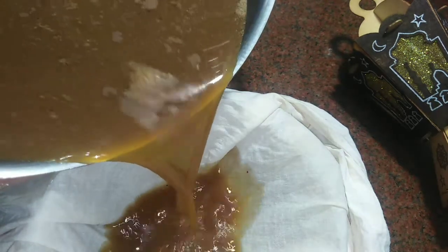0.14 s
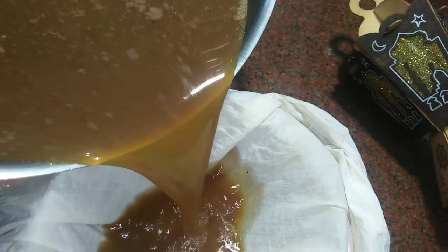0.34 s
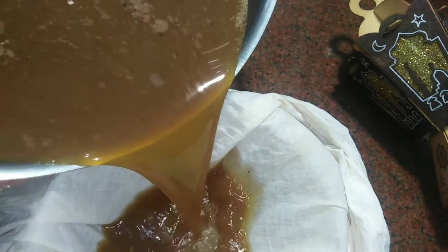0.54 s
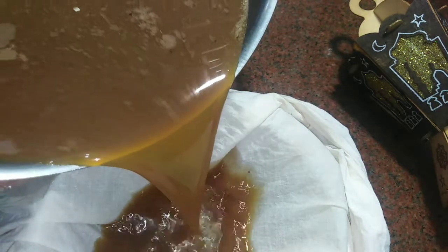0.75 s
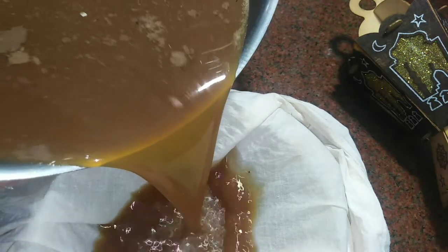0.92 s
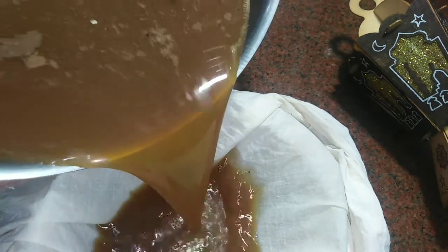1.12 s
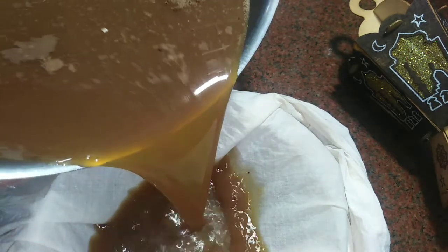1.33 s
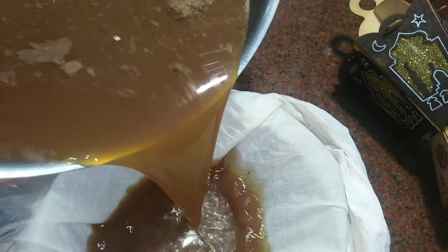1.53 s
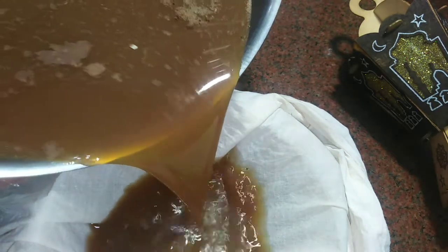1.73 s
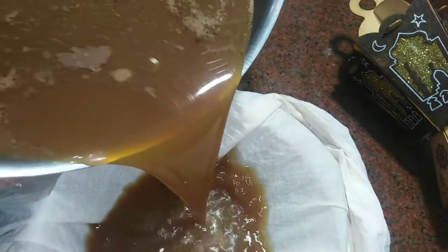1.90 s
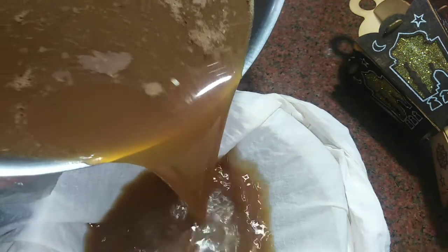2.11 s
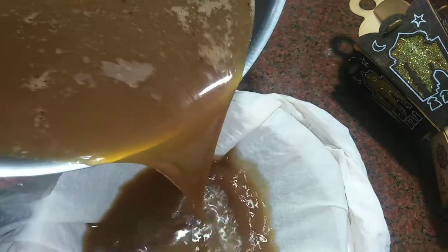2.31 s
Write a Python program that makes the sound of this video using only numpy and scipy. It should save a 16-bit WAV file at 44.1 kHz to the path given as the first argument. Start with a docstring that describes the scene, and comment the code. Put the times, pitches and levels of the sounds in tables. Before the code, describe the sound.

Close wet splatter and popping bubbles of poured syrupy liquid, soon fading beneath a low fan rumble

```python
"""In a kitchen, thick liquid is poured onto a cloth strainer close to a pair of microphone ports.
Bubbles burst and droplets tick, thickly at first, then one by one: short rough sines, each trailed by
background noise let through round its pitch. Ringing drops, fizz and treble specks fill in the splashing.
Below them a fan motor rumbles (banded noise) and hums (sines at multiples of the rotor speed).
A thin whistle sounds on the left, faint rings come and fade, and a soft patchy hiss lies under all."""
import sys
import numpy as np
from scipy import signal
from scipy.io import wavfile

SR = 44100
rng = np.random.default_rng(int(sys.argv[2]) if len(sys.argv) > 2 else 0)


def boost(x):
    """Linear amplitude factor 10**(x/20) for a level x in decibels (scalar or array-like)."""
    u = np.asarray(x, float) / 20
    return 10 ** u


def to_wav(s):
    """Save 16-bit WAV."""
    ch = np.atleast_2d(s).T  # columns
    pcm = np.round(np.clip(ch, -1, 1) * 32767)  # PCM
    wavfile.write(sys.argv[1], SR, pcm.astype(np.int16))


N = 108530  # length in samples

# In all tables a positive left_minus_right_db means louder on the left.
# Bursting bubbles and droplets: start_s, level_db, pitch_hz, left_minus_right_db,
# ringing_cycles (the least number; small or soft pops may ring longer)
POPS = [(0.001, -20.5, 7700, -11, 5.2), (0.0109, -16, 9000, -14.5, 29), (0.031, -30, 3460, -12, 10.6),
        (0.071, -38, 3960, -5, 21), (0.0385, -24.5, 12100, -13, 6.0), (0.0483, -34, 7560, -4, 6.4),
        (0.0662, -17, 9440, -6, 8.5), (0.066, -32, 6440, 1, 8), (0.0876, -51, 6440, 2, 7.3),
        (0.113, -43, 6000, -13.5, 5.7), (0.1145, -17, 10600, -17, 2.9), (0.1396, -51, 2110, -19, 5.2),
        (0.1404, -15.5, 8950, -3, 2.6), (0.211, -28.5, 7650, -7, 8.4), (0.1444, -13.5, 10900, -36, 33.5),
        (0.184, -30, 6660, 2, 7), (0.163, -31, 11800, -33, 6), (0.1838, -24, 12100, -24, 2.3),
        (0.1832, -28, 5000, -2, 7), (0.2128, -17, 11500, -40, 22), (0.231, -28, 11700, -29, 6.8),
        (0.231, -26.5, 4800, 2, 11.4), (0.2357, -20.5, 8300, -4, 4.3), (0.2493, -12.5, 12200, -36, 5.8),
        (0.2492, -14, 6650, 6, 4.7), (0.253, -38, 1766, -8, 6.3), (0.251, -28, 3430, -10, 6.1),
        (0.259, -34, 11670, -30, 4.4), (0.3023, -20.5, 4320, 1, 7.7), (0.306, -20.5, 6110, -3, 8.3),
        (0.2855, -25, 11800, -31, 7.5), (0.2991, -12, 13200, -22, 6.3), (0.3048, -15, 11070, -35.5, 1.4),
        (0.316, -23.5, 11800, -37, 25), (0.351, -33, 3300, 0, 5.2), (0.348, -27, 4850, -20, 4.6),
        (0.3488, -19, 11800, -25.5, 6.0), (0.3601, -30, 1400, -14, 5.9), (0.361, -37.5, 956, -11, 3),
        (0.379, -41, 11800, -27, 8.8), (0.3842, -26, 6960, 2, 3.3), (0.411, -49, 4140, 5, 10),
        (0.432, -43, 11720.0, -41, 5.38), (0.2582, -28.5, 3160, -4, 8), (0.4757, -29, 12100, -48, 2.5),
        (0.477, -26, 5800, -19, 7), (0.4769, -34, 1540, -4, 9), (0.485, -31.5, 4700, -5, 33),
        (0.495, -19, 9100, -11, 5.9), (0.499, -26.5, 6200, 25, 9.1), (0.4982, -33.5, 1580, -6.5, 16),
        (0.502, -25.5, 12000, -41, 16), (0.5133, -14, 12820, -29, 9), (0.499, -29, 3280, 0.5, 5.9),
        (0.51, -26, 4800, -2, 4.5), (0.5377, -33, 6800, 4, 3.8), (0.552, -31.5, 6180, -12, 13),
        (0.571, -47, 5950, -11, 8.4), (0.662, -45, 7700, -16, 8), (0.6601, -18.5, 12470, -24, 12.4),
        (0.89, -34, 8460, -23, 16), (0.7188, -49.5, 4140.0, -27, 8.4), (0.739, -48, 9400, -23, 26),
        (0.7422, -33, 13800, -38, 9.1), (0.766, -25.5, 10850, -22, 6.3), (0.76, -23, 12300, -39, 7.6),
        (0.8452, -31.5, 11800, -46, 6.0), (0.8494, -31, 13000, -40, 9.7), (0.855, -49, 4520, 11, 17.6),
        (0.879, -52, 4060, -11, 8.7), (0.89, -43, 3730, -1, 19), (0.8805, -15.5, 8650, -9.5, 11.6),
        (0.891, -23.5, 11700, -14, 25), (0.9027, -23, 12300, -26, 11), (0.909, -38.5, 4680, -16, 16),
        (0.91, -45.5, 5600, -2, 16), (0.9092, -37, 7700, 8, 6.1), (0.911, -32, 12100, -28, 7.5),
        (0.9298, -51, 2820, -8, 40), (0.968, -50, 5640, -7, 10), (0.968, -24.5, 10000, -26, 7.1),
        (0.987, -31, 14000, -58, 10), (1.049, -39, 12900, -43, 5.3), (1.126, -55, 6570, -19, 24),
        (1.1514, -60, 3460, -8, 26), (1.149, -44.5, 6670, -21, 45), (1.2176, -40, 14000, -43, 12),
        (1.2914, -37.5, 14200, -50, 19), (1.3043, -59.5, 8600, -13, 6.4), (1.4983, -57.5, 8700, -12, 7.5),
        (1.508, -67.5, 2250, -15, 29), (1.5435, -60.5, 3450, -13, 16), (1.549, -33.5, 7640, -5.5, 16),
        (1.5474, -65, 1670, -16, 21), (1.571, -62, 3250, -7, 7.5), (1.6148, -41.5, 1603, -17, 18.5),
        (1.623, -45.5, 5600, -22, 36), (1.622, -50, 4475, -12, 32), (1.638, -53.5, 4320, -18, 27),
        (1.6602, -52, 5240, -2, 3), (1.6605, -51, 1680, -18, 2.5), (1.6703, -37, 6370, -17, 11.5),
        (1.7137, -35, 14000, -54, 38), (1.729, -48.5, 7380, -7.5, 25), (1.7672, -70, 2390, 21, 9.1),
        (1.8433, -49.5, 4400, 8, 3.8), (1.841, -52, 6520, -9, 50), (1.8814, -22, 11870, -54, 6.2),
        (1.884, -41, 8140, -25, 17), (1.945, -67, 1040.0, -48, 7.8), (1.959, -42.5, 5600, -9, 12),
        (1.96, -49, 3290, -27, 20), (1.959, -47, 11800, -38, 13), (1.956, -55, 7500, -16, 12),
        (2.005, -36.5, 5100, -0.5, 22), (2.0065, -49, 11500, -26, 11), (2.021, -48, 7700, -4.5, 36),
        (2.034, -42, 4310, 6, 41), (2.019, -51, 3260, -7, 18), (2.068, -33, 4400, -6, 16),
        (2.069, -43, 3090, -9.5, 13), (2.069, -50.5, 2370, -9, 14), (2.086, -45.5, 4400, 8, 7.5),
        (2.1815, -43, 3570, -24, 20), (2.1942, -57, 6720, -21, 13), (2.2076, -52, 9640, -34, 5.0),
        (2.212, -59, 3240, -17, 3.5), (2.2555, -55, 6660, -17, 12), (2.2658, -51.5, 7800, -28, 36),
        (2.302, -61, 7600, -14, 10), (2.312, -48.5, 3810, -33, 30), (2.3437, -55, 3800.0, -21, 10.0),
        (2.345, -44, 6560, -14, 34), (2.3616, -39.5, 11940, -38, 47), (2.3726, -45, 3000, -14, 18),
        (2.408, -44, 4770, -38, 11.6), (2.423, -55, 2900, -1, 7.6), (2.427, -57, 5000, -11, 7.2),
        (2.435, -59, 2960, -5, 4.6), (2.436, -35, 6100, -12, 6.5), (2.445, -39.5, 1150, -16, 17),
        (2.4527, -53.5, 3140, -12, 40), (2.455, -35, 7500, -26, 8)]
# Vigour of the splashing over time: time_s, vigour_db
SPLASH_VIGOUR = [(0.0, -39), (0.19, -37.5), (0.38, -33.5), (0.57, -45), (0.9, -68.5), (1.07, -60),
                 (1.4, -69), (1.65, -62), (2.46, -61)]
# Tone colour of the splashing: frequency_hz, relative_level_db (per Hz)
SPRAY_COLOUR = [(1000, 2), (1600, -1.5), (2200, 4), (3500, 13.5), (5500, 6), (8000, -3.5), (12000, -11),
                (15000, 27.5)]
# Side of the splashing: frequency_hz, left_minus_right_db
SPRAY_PAN = [(1000, 5), (2500, -5.5), (5000, 5), (8000, 12), (12000, -45.5), (15000, -38)]
# Rumble from the air and housing of the fan: frequency_hz, relative_level_db (per Hz)
RUMBLE_COLOUR = [(25, 5.5), (50, -8.5), (86, -1), (128, -5.5), (200, -8), (300, -15.5), (400, -19),
                 (500, -19.5), (640, -28)]
# Rumble strength over time, before trimming: time_s, deep_db, upper_db
RUMBLE_LEVEL = [(0.0, -32.5, -35), (0.57, -31, -43), (0.77, -48.5, -38), (0.92, -29.5, -37.5),
                (1.12, -29.5, -52.5), (1.26, -35.5, -35.5), (2.24, -34, -35), (2.46, -29.5, -36.5)]
# Side of the rumble: frequency_hz, left_minus_right_db
RUMBLE_PAN = [(60, -1.5), (110, 0.5), (200, 4), (380, -10), (700, 9), (1290, 5), (2380, 14), (4400, 3),
              (8120, -11), (15000, -3)]
# How alike left and right are in the noises: frequency_hz, likeness (0 to 1)
LIKENESS = [(60, 1), (130, 0.99), (290, 0.95), (640, 0.55), (1410, 0.36), (3100, 0.07), (6820, 0.029),
            (15000, 0.22)]
# Motor tones: multiple_of_rotor_speed, level_db (rms, before wavering), left_minus_right_db
MOTOR_TONES = [(3, -54.5, -3.5), (4, -47.5, -0.5), (5, -43.5, 2.5), (6, -49, -4), (7, -50.5, 2),
               (8, -43, 3), (10, -47, 0.5), (11, -53.5, 0.5), (12, -50.5, 0), (13, -49.5, 5.5),
               (14, -53, -4.5), (16, -46.5, -5.5), (17, -57, 10), (18, -69.5, 11), (19, -65.5, -20.5),
               (20, -57.5, 0.5), (21, -57, 3.5), (23, -61.5, -4), (24, -58.5, 4)]
# Faint rings that come and go: start_s, length_s, pitch_hz, start_level_db, left_minus_right_db
FAINT_RINGS = [(0.283, 0.046, 1570, -43, -14), (0.513, 0.046, 1600, -61, -11),
               (1.042, 0.12, 2557, -73.5, 30), (1.605, 0.14, 3070, -64, 4), (1.608, 0.098, 2673, -67.5, 7),
               (1.757, 0.093, 2375, -65, 27), (1.896, 0.14, 2547, -68.5, 15), (2.019, 0.05, 2590, -62.5, 7),
               (2.076, 0.08, 4200, -72, 9.5), (2.178, 0.12, 2547, -62.5, 8), (2.292, 0.033, 2520, -68, 6),
               (1.946, 0.143, 1050, -68.5, -17), (2.088, .07, 3130, -70, -17),
               (2.177, 0.086, 2290, -63, -22), (2.359, 0.034, 1930, -55, -19),
               (1.54, 0.061, 5800, -61.5, -11)]
# Tone colour of the hiss: frequency_hz, relative_level_db (per Hz)
HISS_COLOUR = [(15, 14), (45, 15), (70, 9.5), (500, 7), (700, 4), (1200, -5.5), (3000, -14.5), (8000, -14),
               (13500, -24.5), (16000, -19.5)]
# Side of the hiss: frequency_hz, left_minus_right_db
HISS_PAN = [(60, -9.0), (15000, 11)]

PORT_LAG_S = 0.00016  # the left port hears the liquid later
SPRAY_TOP_HZ, CUTOFF_HZ = 14300, 13100  # top of the noises; top of the ticks and of the whole mix


def rms_one(x):
    """Scale to an average strength (rms) of 1."""
    return x / np.sqrt(np.mean(x ** 2) + 1e-20)


def in_time(rows):
    """Turn the columns of a table into curves over all samples."""
    time_s, *columns = np.transpose(rows)
    return [np.interp(np.arange(N) / SR, time_s, column) for column in columns]


def at_hz(points, hz):
    """Read a frequency table at hz, with frequency on a musical (log) scale."""
    table_hz, values = np.transpose(points)
    return np.interp(np.log(hz), np.log(table_hz), values)


def panned(pan_db):
    """Left and right gains that keep the mean power."""
    gains = boost(np.array([[pan_db / 2], [-pan_db / 2]]))
    return gains / np.sqrt(np.mean(gains ** 2))


def drift(rate_hz):
    """Smooth random wandering of spread 1: low-passed noise made at every 40th sample."""
    r = np.exp(-80 * np.pi * rate_hz / SR)
    noise = rng.standard_normal(N // 40 + 2002)
    slow = signal.lfilter([1], [1, -2 * r, r * r], noise)[2000:]  # drop the filter's start
    return np.interp(np.arange(N) / 40, np.arange(len(slow)), rms_one(slow - slow.mean()))


def band(x, low_hz, high_hz):
    """Keep only the frequencies between two limits."""
    limits = [low_hz, min(high_hz, .45 * SR)]
    return signal.sosfilt(signal.butter(2, limits, "band", fs=SR, output="sos"), x)


def cut(x, hz, kind):
    """Steep high- or low-pass."""
    return signal.sosfilt(signal.butter(8, hz, kind, fs=SR, output="sos"), x)


def banded_noise(colour, pan, patchy_db, flicker_hz):
    """Third-octave bands of stereo noise, each with its own level, side, likeness and flicker."""
    lowest, highest = colour[0][0], colour[-1][0]
    edges = lowest * 2 ** np.arange(0, np.log2(highest / lowest) + .01, 1 / 3)
    white = rng.standard_normal((2, 2, N + 8000))
    bands = []
    for k, (low, high) in enumerate(zip(edges, edges[1:])):
        # neighbouring bands use different noise
        mid, side = band(white[k % 2], low, high)[:, -N:]
        hz = np.sqrt(low * high)
        alike = np.clip(at_hz(LIKENESS, hz), 0, 1)
        gain = boost(at_hz(colour, hz) + patchy_db * drift(flicker_hz)) * panned(at_hz(pan, hz))
        stereo = np.sqrt(1 + alike) * mid + np.sqrt(1 - alike) * side * [[1], [-1]]
        bands.append(gain * stereo)
    return edges[:-1], np.array(bands)


def tone(hz, db, pan_db, waver_db, waver_hz, pace_hz=5.8):
    """A sine whose level and pitch waver."""
    phase = 2 * np.pi * (np.cumsum(hz + waver_hz * drift(pace_hz)) / SR + rng.random())
    level = np.sqrt(2) * boost(db + waver_db * drift(pace_hz))
    return level * np.sin(phase) * panned(pan_db)


def hiss():
    """Faint noise whose frequency bands swell and sink separately."""
    _, bands = banded_noise(HISS_COLOUR, HISS_PAN, patchy_db=2, flicker_hz=12)
    return boost(-66) * rms_one(cut(bands.sum(axis=0), SPRAY_TOP_HZ, "low"))


def faint_rings():
    """Narrow bands of noise sound like rough rings; they come, throb and fade."""
    half_width_hz, fade_db, throb_db = 40, 4, 4
    t = np.arange(N) / SR
    out = np.zeros((2, N))
    for start, length, hz, db, pan_db in FAINT_RINGS:
        on = np.clip(np.minimum(t - start, start + length - t) / .015, 0, 1)  # 15 ms ramps
        ring = rms_one(band(rng.standard_normal(N), hz - half_width_hz, hz + half_width_hz))
        faded_db = fade_db * np.clip((t - start) / length, 0, 1)
        out += on * boost(db + throb_db * drift(20) - faded_db) * ring * panned(pan_db)
    return out


def whistle():
    """One thin tone on the left, nearly steady in level and pitch."""
    return tone(hz=4941, db=-61, pan_db=25, waver_db=1.0, waver_hz=3.0)


def fan_rumble():
    """Moving air and a shaking housing make low noise; its deep and upper parts swell separately."""
    split_hz, lowest_hz, highest_hz = 140, 58, 500
    deep_db, upper_db = in_time(RUMBLE_LEVEL)
    lows, bands = banded_noise(RUMBLE_COLOUR, RUMBLE_PAN, patchy_db=3.5, flicker_hz=15.5)
    is_deep = lows < split_hz
    deep = boost(deep_db - 4.5) * rms_one(bands[is_deep].sum(axis=0))
    upper = boost(upper_db - 5.0) * rms_one(bands[~is_deep].sum(axis=0))
    return cut(cut(deep + upper, lowest_hz, "high"), highest_hz, "low")


def motor_hum():
    """A turning rotor hums at whole multiples of its speed, each tone wavering by itself."""
    rotor_hz = 20.172
    return sum(tone(multiple * rotor_hz, db, pan_db, waver_db=3.0, waver_hz=0.89)
               for multiple, db, pan_db in MOTOR_TONES)


def chance_hits(per_s, vigour_db, spread_db, most):
    """Random hits of uneven size; per_s is the rate at full vigour, fewer come when it is lower."""
    sizes = boost(spread_db * np.minimum(rng.exponential(1, N), most))
    rate = per_s * boost((vigour_db - vigour_db.max()) / 2)
    return sizes * (rng.random(N) < rate / SR)


def ringing_drops(vigour_db):
    """Many small drops, each hit setting off one of 24 decaying resonators."""
    ring_cycles, lag = 15, int(PORT_LAG_S * SR)  # cycles to fall 30 dB in one pass; samples
    hits = chance_hits(1100, vigour_db, spread_db=3, most=4)
    dealt = rng.integers(0, 24, N)  # which resonator each hit goes to
    drops = np.zeros((2, N))
    for k, hz in enumerate(np.geomspace(1500, 14000, 24)):
        r = boost(-30 * hz / (ring_cycles * SR))
        w = 2 * np.pi * hz / SR
        resonator = [1, -2 * r * np.cos(w), r * r]
        rung = signal.lfilter([0, np.sin(w)], resonator, hits * (dealt == k) + 1e-18)
        # a second pass softens the start
        rung = signal.lfilter([0, (1 - r) * np.sin(w)], resonator, rung)
        gain = boost(at_hz(SPRAY_COLOUR, hz)) * hz * panned(at_hz(SPRAY_PAN, hz))
        drops += gain * [np.roll(rung, lag), rung]
    return rms_one(drops)


def fizz():
    """Fine spray blurs into noise whose bands flicker quickly."""
    _, bands = banded_noise(SPRAY_COLOUR, SPRAY_PAN, patchy_db=5, flicker_hz=40)
    return rms_one(cut(bands.sum(axis=0), SPRAY_TOP_HZ, "low"))


def ticks(vigour_db):
    """Bright specks of spray: brief dying puffs of treble noise."""
    fall_s, low_hz = .002, 7000
    hits = chance_hits(170, vigour_db, spread_db=5, most=2)
    r = np.exp(-1 / (fall_s * SR))
    puffs = signal.lfilter([1], [1, -r], hits + 1e-18) * rng.standard_normal((2, N))
    return rms_one(cut(band(puffs, low_hz, 2 * low_hz), CUTOFF_HZ, "low")) * panned(-15)


def splash():
    """Drops, fizz and ticks together grow louder with the vigour of the splashing."""
    vigour_db, = in_time(SPLASH_VIGOUR)
    drops = boost(-8) * ringing_drops(vigour_db)
    return boost(vigour_db) * (drops + boost(-17.5) * fizz() + boost(-16) * ticks(vigour_db))


def pops():
    """A bubble bursts as a short rough sine rising in pitch; background noise let through round
    that pitch then dies away."""
    attack_share, rise_per_cycle, fall_nepers = .25, .002, 2  # shares of the ringing; fall over it
    roughness = .55  # noise added to a sine of 1
    tail_db, tail_follows, tail_t60_s = -29, 0.73, 0.26  # base level, share of the pop's dB, decay
    tilt_db, grain_db = -3.5, 3.5  # tail level per octave above 5 kHz; its random flutter
    puff_db, puff_s = -34, 0.018  # short broad puff of noise with each pop
    size = 9000  # samples kept for each pop
    bursts, tails = np.zeros((2, N + SR)), np.zeros((2, N + SR))
    t = np.maximum(np.arange(size) / SR - np.array([[PORT_LAG_S], [0]]), 0)
    grain = drift(42)
    closing = np.clip(2 - 2 * t / (size / SR), 0, 1)  # the second half fades out
    for start, db, hz, pan_db, cycles in POPS:
        # soft pops ring longer; deep ones may be as short as 4 ms
        fewest = min(11, hz * .004) + .75 * np.clip(-30 - db, 0, 20)
        cycles = max(cycles, fewest)
        n = hz * t  # cycles passed
        # noise round the pitch, narrower for long rings
        ratio = 2 ** min(2.45 / cycles, .28)
        noise = rng.standard_normal((2, size + 2000))
        near = band(band(noise, hz / ratio, hz * ratio), hz / ratio, hz * ratio)
        near = rms_one(near[:, -size:])
        attack = attack_share * cycles
        onset = np.sin(np.pi / 2 * np.minimum(n / attack, 1)) ** 2
        fall = np.exp(-fall_nepers * np.maximum(n - attack, 0) / cycles)
        sine = np.sin(2 * np.pi * n * (1 + rise_per_cycle * (n - cycles) / 2))
        burst = onset * fall * (sine + roughness * near)
        flutter_db = grain_db * np.roll(grain, -rng.integers(N))[:size]
        level_db = tail_db + tilt_db * np.log2(hz / 5000) + tail_follows * db
        tail = near * onset * boost(level_db + flutter_db - 60 * t / tail_t60_s) * closing
        puff = np.exp(-t / puff_s) * band(rng.standard_normal((2, size)), 500, 2000)
        tail = tail + boost(db + puff_db) * puff
        i = int(start * SR)
        bursts[:, i:i + size] += boost(db) * panned(pan_db) * burst
        tails[:, i:i + size] += panned(0.72 * pan_db) * tail  # tails sit nearer the middle
    return (bursts + cut(tails, SPRAY_TOP_HZ, "low"))[:, :N]


def scene():
    """Hiss, faint rings, whistle, fan and liquid added together."""
    background = hiss() + faint_rings() + whistle()
    fan = fan_rumble() + motor_hum()
    return background + fan + splash() + pops()


def roll_off(x):
    """The treble ends steeply here."""
    return signal.sosfilt(signal.butter(12, 15640, fs=SR, output="sos"), x)


def record(dry):
    """Round off the loudest peaks, then take away the top of the treble."""
    peak_top = .55
    rounded = peak_top * np.tanh(dry / peak_top)
    treble_cut = signal.butter(6, CUTOFF_HZ, fs=SR, output="sos")
    finished = signal.sosfilt(treble_cut, rounded)
    return roll_off(finished)


dry = scene()
out = record(dry)
to_wav(out)
```